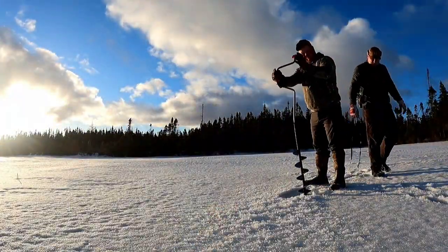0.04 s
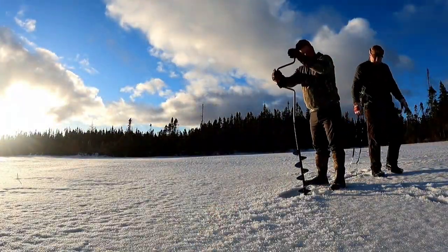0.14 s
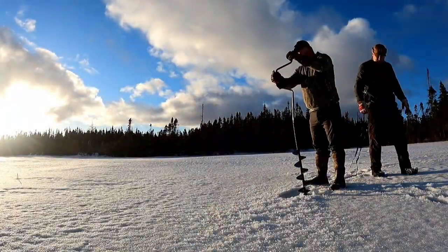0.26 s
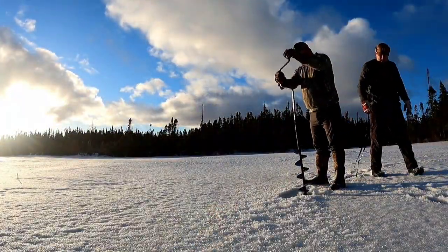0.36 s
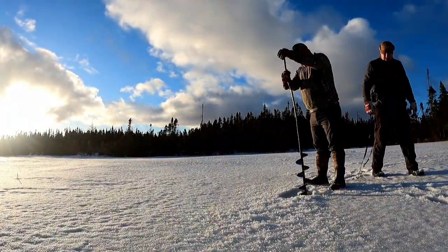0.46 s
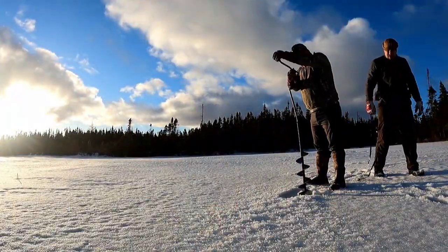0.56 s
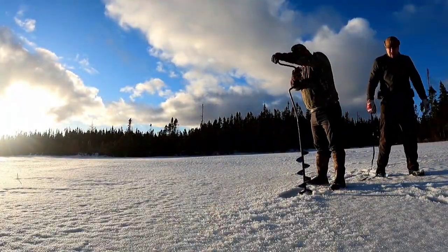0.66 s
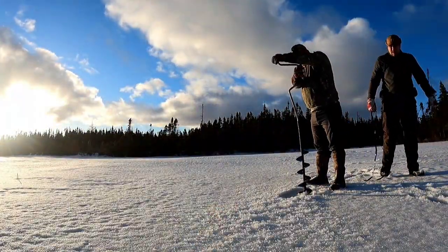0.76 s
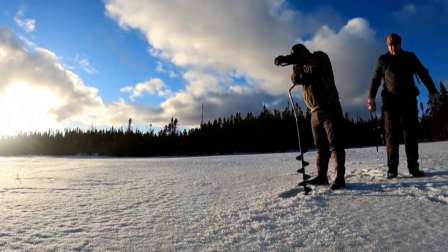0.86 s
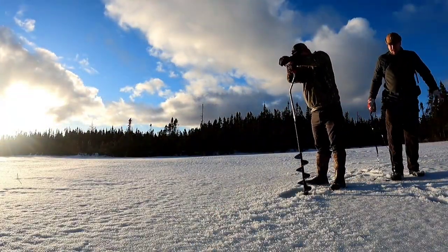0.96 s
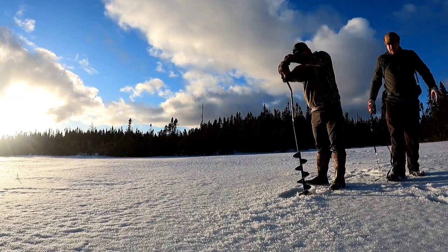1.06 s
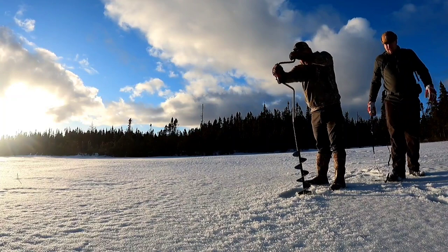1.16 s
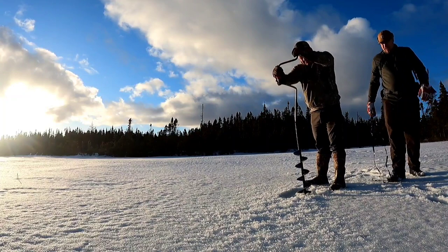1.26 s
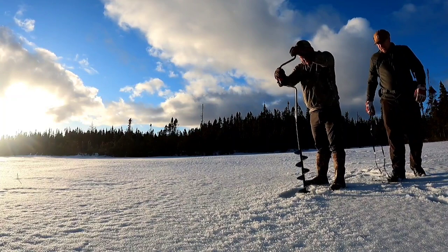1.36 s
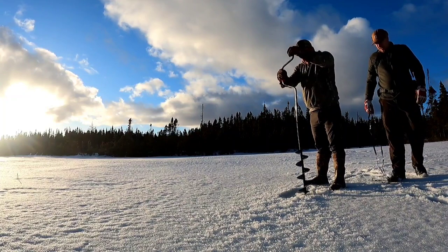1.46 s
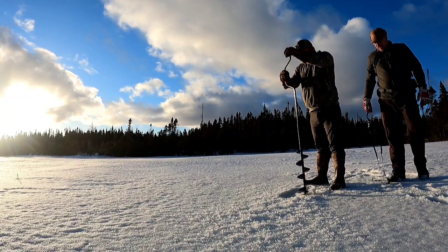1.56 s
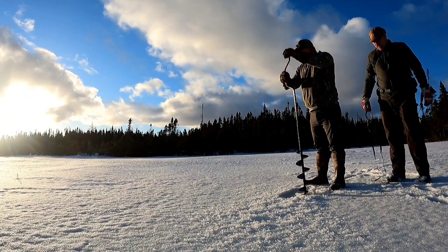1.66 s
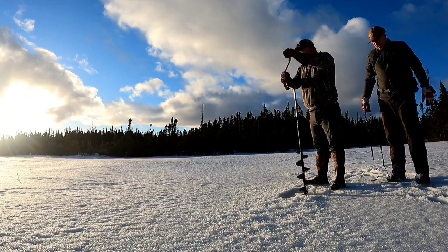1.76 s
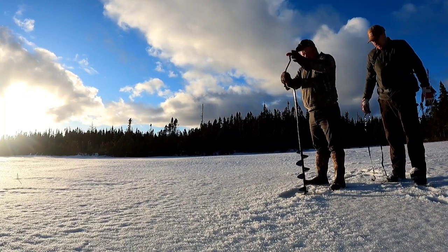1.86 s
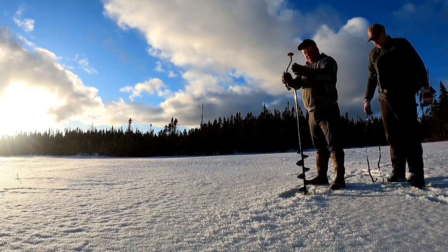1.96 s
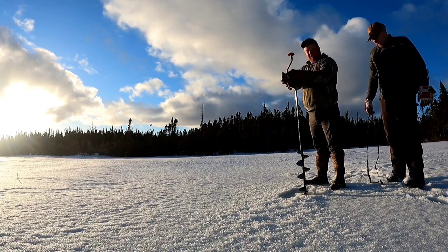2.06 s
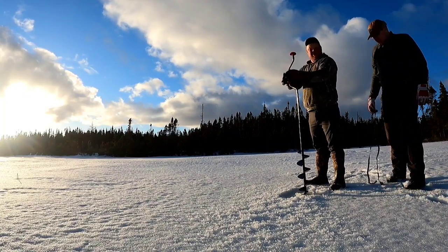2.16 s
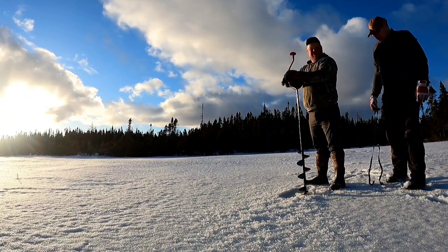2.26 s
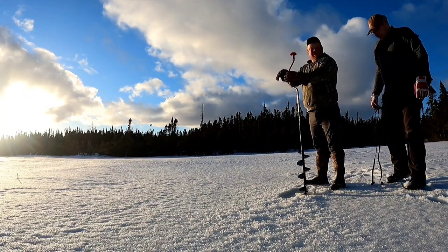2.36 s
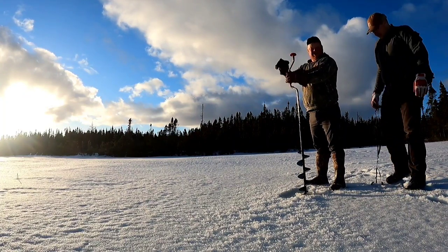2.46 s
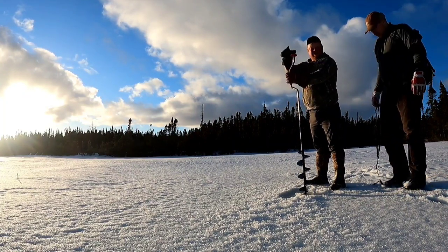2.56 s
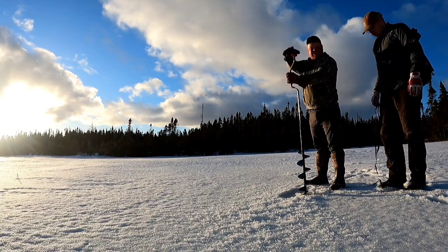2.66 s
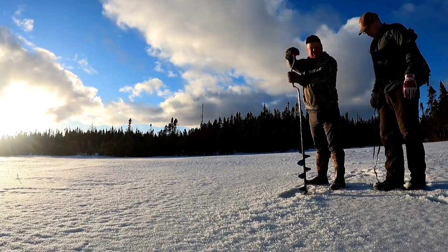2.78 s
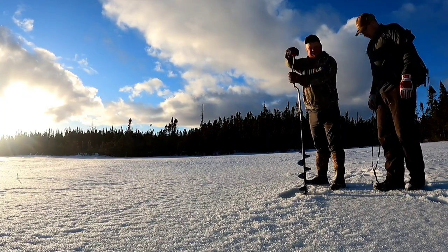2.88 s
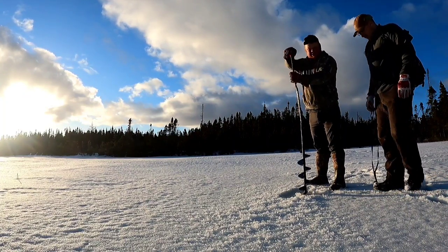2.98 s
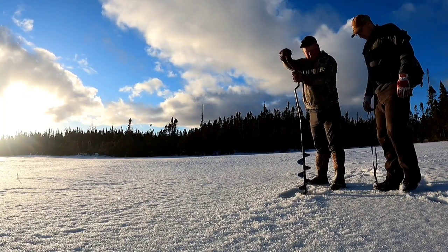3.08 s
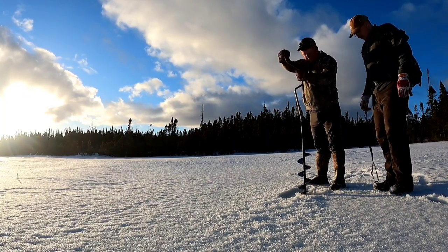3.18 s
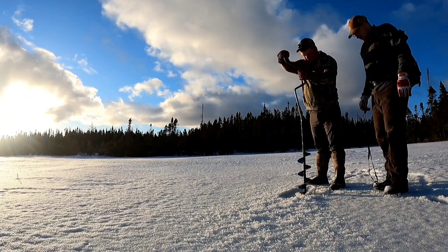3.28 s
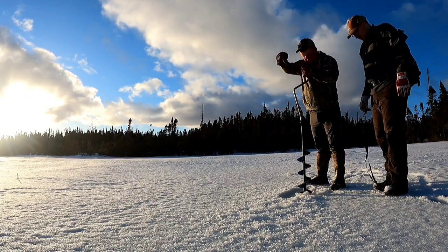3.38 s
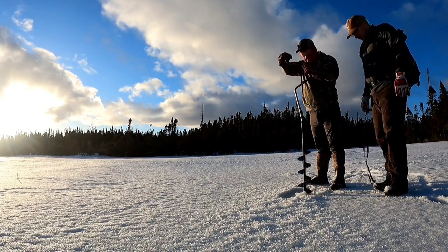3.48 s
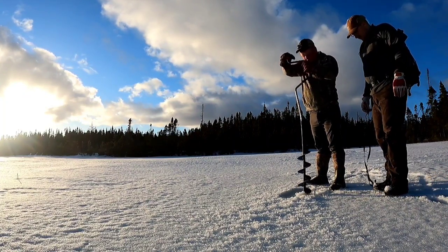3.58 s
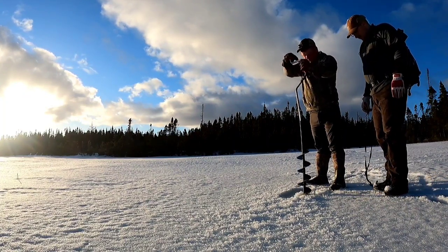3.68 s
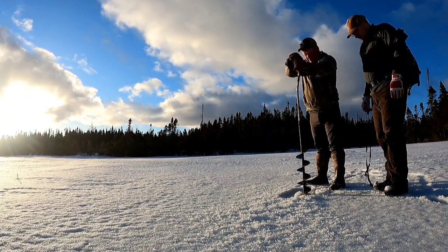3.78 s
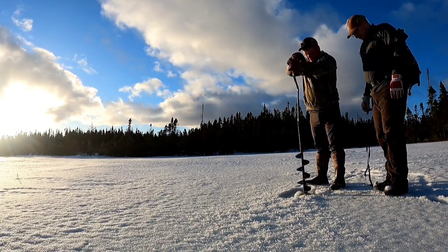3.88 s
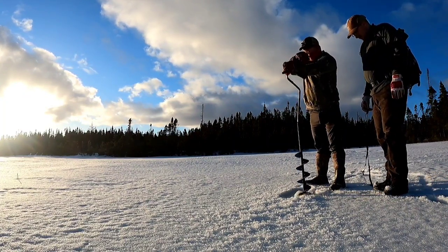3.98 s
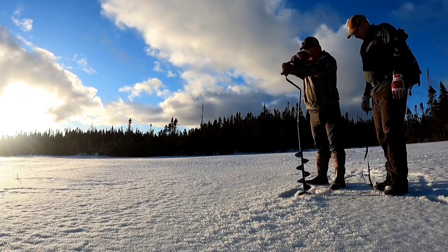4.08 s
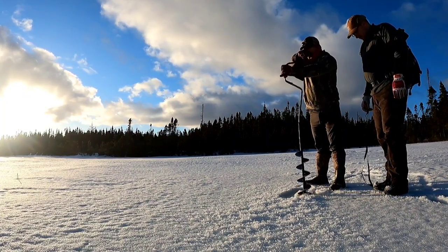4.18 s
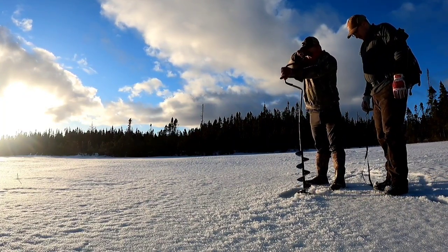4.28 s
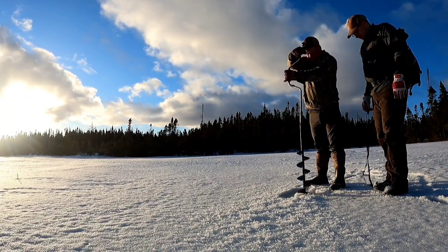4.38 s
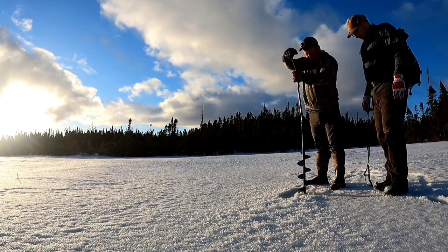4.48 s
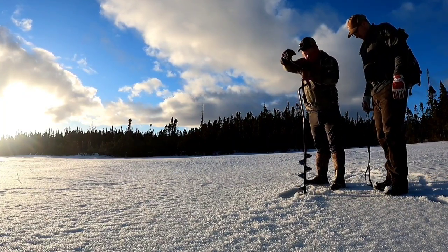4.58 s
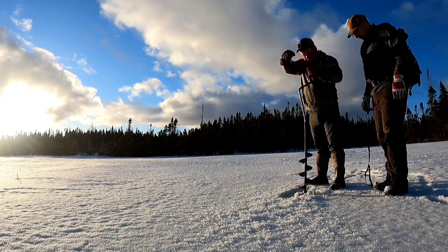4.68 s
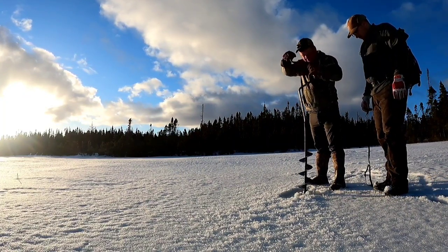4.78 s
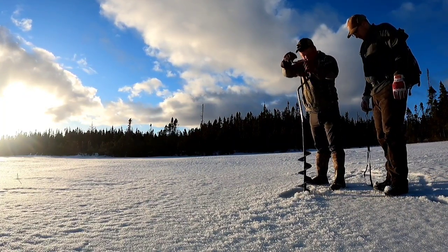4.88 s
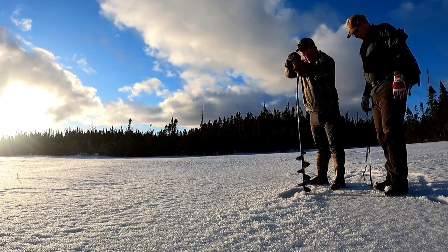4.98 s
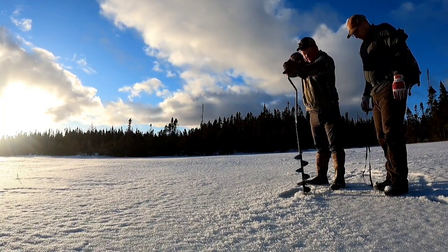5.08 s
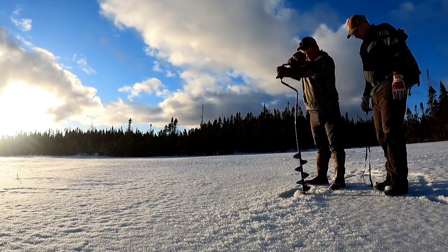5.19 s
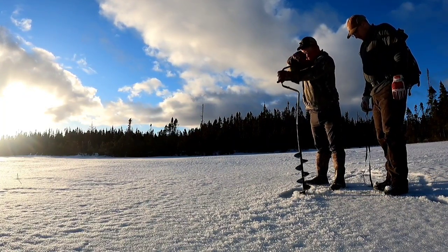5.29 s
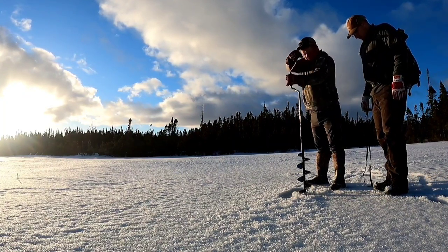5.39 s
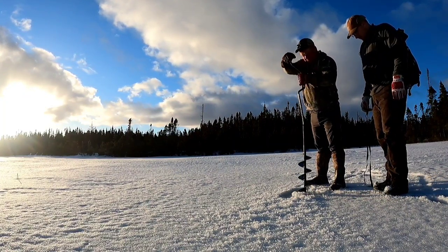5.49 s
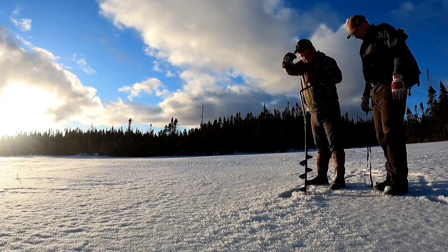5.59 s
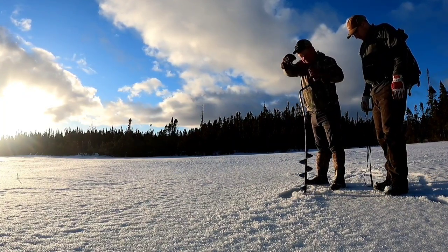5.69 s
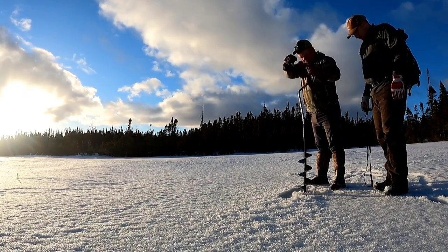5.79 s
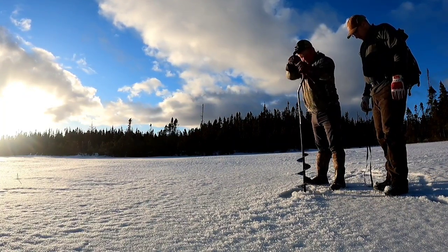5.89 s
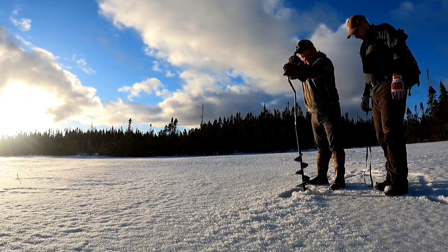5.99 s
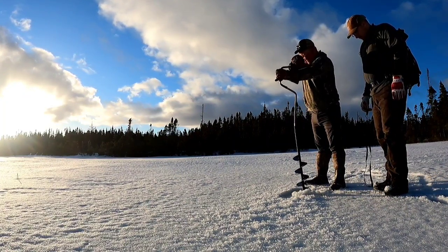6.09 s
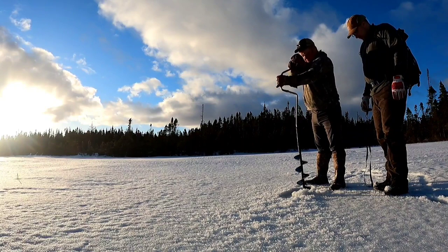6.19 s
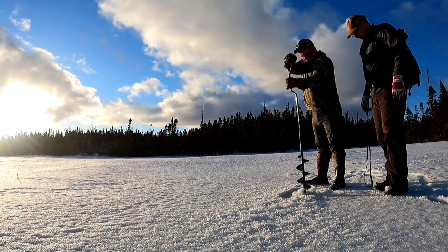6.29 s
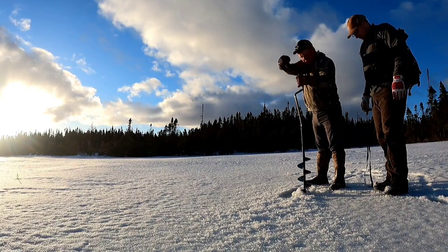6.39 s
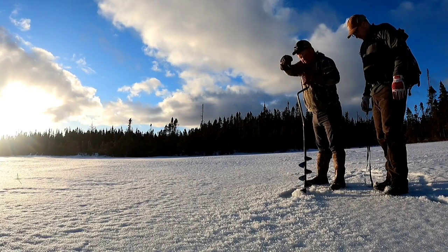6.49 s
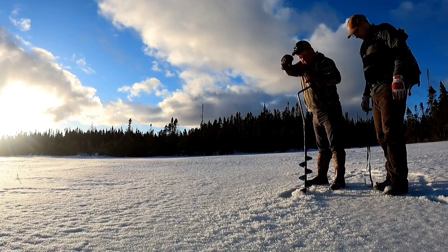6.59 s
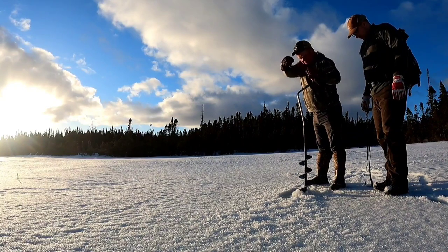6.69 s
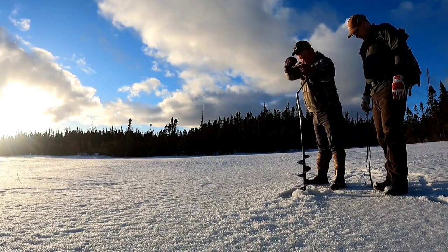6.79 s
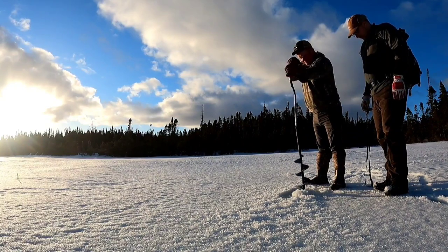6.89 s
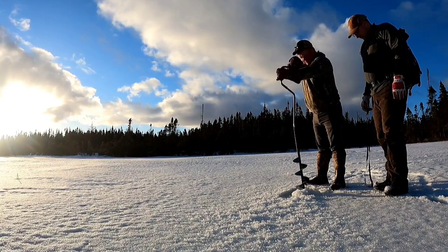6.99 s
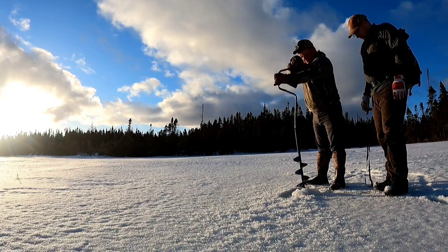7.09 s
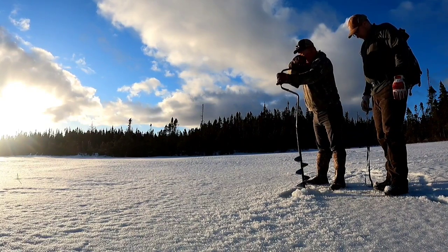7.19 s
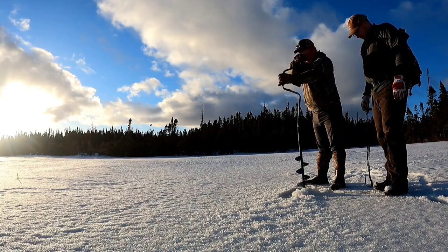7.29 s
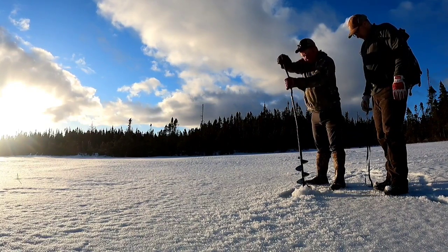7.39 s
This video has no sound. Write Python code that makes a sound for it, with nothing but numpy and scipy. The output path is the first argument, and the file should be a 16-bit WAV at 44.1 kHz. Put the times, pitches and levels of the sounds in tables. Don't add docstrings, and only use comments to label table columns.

```python
import sys
import numpy as np
from scipy import signal
from scipy.fft import rfft, irfft, next_fast_len
from scipy.io import wavfile
from scipy.ndimage import uniform_filter1d

SR = 44100
rng = np.random.default_rng(int(sys.argv[2]) if len(sys.argv) > 2 else 0)


def gain_from_decibels(decibels):
    exponent = np.asarray(decibels, float) / 20
    return 10 ** exponent


def persist_wave(psi):
    counts = np.round(np.clip(psi, -1, 1) * 32767).astype(np.int16)
    wavfile.write(sys.argv[1], SR, np.atleast_2d(counts).T)


N = 328545


def evened(x):
    return x / np.sqrt(np.mean(x ** 2) + 1e-20)


def read(points, hz):
    f, value = np.transpose(points)
    return np.interp(np.log(hz + 1), np.log(f + 1), value)


def coloured(x, points, low_hz=1, high_hz=SR):
    size = next_fast_len(N)
    hz = np.fft.rfftfreq(size, 1 / SR)
    gain = gain_from_decibels(read(points, hz)) * (hz < points[-1][0])
    edge_loss = (1 + (low_hz / (hz + 0.1)) ** 30) * (1 + (hz / high_hz) ** 30)
    gain *= edge_loss ** -0.5
    return irfft(rfft(x, size) * evened(gain), size)[:N]


def wander(per_s):
    knots = uniform_filter1d(rng.standard_normal(400), size=2)
    return np.interp(np.arange(N) * per_s / SR, np.arange(400), evened(knots))


def ring(x, hz, width):
    r = np.exp(-np.pi * width / SR)
    pole = r * np.exp(2j * np.pi * hz / SR)
    return signal.lfilter([np.sqrt(2 * (1 - r * r))], [1, -pole], x).imag


def grit(per_s, spread_db, hiss, shake_db):
    sizes = gain_from_decibels(spread_db * np.minimum(rng.exponential(1, N), 5))
    snaps = sizes * (rng.random(N) < per_s / SR)
    snaps = snaps * rng.choice([-1, 1], N)
    mixed = evened(snaps) + hiss * rng.standard_normal(N)
    return evened(mixed * gain_from_decibels(shake_db * wander(45)))


def patchy(x, depth_db):
    z = signal.stft(x, nperseg=256, noverlap=192)[2]
    field = uniform_filter1d(rng.standard_normal(z.shape), size=3, axis=0)
    field = uniform_filter1d(field, size=40, axis=1)
    gain = evened(gain_from_decibels(depth_db * evened(field)))
    return signal.istft(z * gain, nperseg=256, noverlap=192)[1][:N]


def swells(rows, rest_db):
    t, power = np.arange(0, N, 16) / SR, gain_from_decibels(2 * rest_db)
    for peak_s, level_db, rise_s, fall_s in rows:
        drop_db = 10 * np.where(t < peak_s, (peak_s - t) / rise_s, (t - peak_s) / fall_s)
        power = power + gain_from_decibels(2 * (level_db - drop_db))
    return np.interp(np.arange(N) / SR, t, 10 * np.log10(power))


# pitch_hz, density_db [dB per Hz]
AIR_COLOUR = [(180, -39), (300, 2), (543, -26), (1030, 2.5), (2730, -17), (6130, -15), (11100, -27),
              (15400, -40)]


def air():
    return gain_from_decibels(-60.5) * coloured(rng.standard_normal(N), AIR_COLOUR)


# pitch_hz, density_db [dB per Hz]
GUST_COLOUR = [(8.8, -36), (15, 0), (45, -4.5), (135, -22.5), (180, -56), (300, -120)]
# peak_s, level_db, rise_s, fall_s
GUST_SWELLS = [(0.0, -42.5, 0.12, .4), (0.37, -38.5, .15, 0.53), (0.97, -38, 0.18, .2),
               (1.14, -29, 0.13, 0.094), (1.28, -25.5, .03, 0.047), (1.45, -45, 0.13, .09),
               (1.72, -42, 0.15, .07), (1.84, -34, 0.019, .15), (2.1, -42.5, .3, .3),
               (2.55, -38, 0.22, 0.2), (2.86, -29.5, .03, .025), (3.2, -44.5, 0.38, 0.27),
               (3.55, -38.5, 0.045, 0.04), (3.8, -37, 0.099, 0.044), (4.04, -35.5, 0.12, .055),
               (4.17, -39.5, 0.055, .24), (4.58, -34, 0.11, .08), (4.83, -35.5, 0.27, .2),
               (5.1, -40, .2, .3), (5.39, -34.5, 0.32, 0.082), (5.58, -40, .3, 0.34),
               (5.81, -29, .045, .07), (6.12, -45, 0.062, .085), (6.6, -31, .035, 0.14),
               (7.1, -39, .06, .08), (7.35, -40.5, 0.088, 0.041)]
# start_s, peak_db, pitch_hz, t60_s
WIND_SLAPS = [
    (0.344, -23.5, 46.4, 0.13),
    (0.713, -24, 32, 0.095),
    (1.275, -29, 48.4, 0.1),
    (1.847, -20, 40.7, 0.053),
    (1.959, -25, 43.4, 0.14),
    (2.684, -21, 32, 0.15),
    (2.783, -22.5, 43.1, 0.1),
    (6.592, -19.5, 62, 0.21),
]


def wind():
    shared = coloured(grit(60, 5.0, 0.79, 0.94), GUST_COLOUR)
    apart = coloured(grit(60, 5.0, 0.79, 0.94), GUST_COLOUR)
    gust, t = gain_from_decibels(swells(GUST_SWELLS, rest_db=-66)), np.arange(6000) / SR
    shared = shared * gust
    for start_s, peak_db, pitch_hz, t60_s in WIND_SLAPS:
        at = round(start_s * SR)
        thump = np.sin(2 * np.pi * pitch_hz * t) * np.minimum(t / 0.0041, 1)
        shared[at:at + len(t)] += gain_from_decibels(peak_db - 60 * t / t60_s) * thump
    return shared * gain_from_decibels([[-2.5], [2.1]]) + 0.46 * gust * apart * np.array([[1], [-1]])


# pitch_hz, density_db [dB per Hz]
SNOW_COLOUR = [(150, -33), (250, -4), (507, -9), (592, -9.5), (960, -3.5), (1480, -10), (2160, -13),
               (5030, -11.5), (8300, -23), (12100, -24), (15400, -43)]
# peak_s, level_db, rise_s, fall_s, cloth_db [against the crunch]
BOOT_STEPS = [(0.0, -49.5, .02, 0.032, -9), (0.064, -53, .03, 0.015, -4), (0.15, -73, .2, .2, -6),
              (0.275, -52, 0.027, .03, -7), (1.7, -51.5, .05, 0.13, -5), (1.78, -55, 0.066, 0.03, -6),
              (1.86, -53, 0.039, .05, -7), (1.9, -57, .03, .015, -6), (2.04, -53, 0.043, 0.11, -12),
              (2.132, -48.5, .004, 0.021, -18), (2.24, -46, 0.13, 0.02, -13.5),
              (2.3, -51, 0.023, 0.074, -14), (2.406, -55.5, 0.035, 0.075, -9), (2.51, -58, 0.048, 0.14, -4),
              (2.61, -56, 0.023, 0.12, -2.5), (2.715, -50.5, 0.033, .08, -4),
              (2.79, -39.5, 0.051, 0.075, -12), (2.901, -38, .003, 0.025, -14),
              (2.94, -52.5, .03, .15, -11), (3.04, -56, .04, .02, -15)]


def shuffle():
    cloth_hz, rest_db = 7000, -86
    steps = np.array(BOOT_STEPS)
    crunch_db = swells(steps[:, :4], rest_db)
    cloth_steps = steps[:, :4] + np.outer(steps[:, 4], [0, 1, 0, 0])
    cloth_db = swells(cloth_steps, rest_db - 8)
    grains = grit(5000, 2.5, 1.4, 1.3)
    crunch = coloured(grains * gain_from_decibels(crunch_db), SNOW_COLOUR, 1, cloth_hz)
    cloth = coloured(grains * gain_from_decibels(cloth_db), SNOW_COLOUR, cloth_hz)
    return gain_from_decibels(4.5) * crunch + gain_from_decibels(1.0) * cloth


# start_s, peak_db, pitch_hz, t60_s, crack_db [against the peak]
DULL_KNOCKS = [
    (1.187, -21, 215, 0.03, -12),
    (1.265, -22.5, 930, 0.028, -12),
    (2.131, -39, 163, 0.055, -12),
    (2.244, -26, 151, 0.042, -4),
    (2.487, -34, 190, 0.081, -7),
    (2.778, -32, 199, 0.056, -12),
    (2.898, -25, 159, 0.058, -8),
    (2.5426, -37, 1100, 0.043, -20),
]


def knocks():
    out, t = np.zeros(N), np.arange(3000) / SR
    for start_s, peak_db, pitch_hz, t60_s, crack_db in DULL_KNOCKS:
        crack = signal.lfilter(*signal.butter(2, 5000, fs=SR), rng.standard_normal(len(t)))
        crack = crack * np.exp(-t / 0.012)
        body = np.sin(2 * np.pi * pitch_hz * t) * gain_from_decibels(-60 * t / t60_s)
        blow = body + gain_from_decibels(crack_db) * crack / 3
        at = round(start_s * SR)
        out[at:at + len(t)] += gain_from_decibels(peak_db) * blow * np.minimum(t / 0.0018, 1)
    return out


# time_s, seating [0-1], weight [0-1], flex [0-1]
DRILLER_GRIP = [(0.3, 0.43, 0.45, 0.02), (0.6, 0.55, 0.45, 0.53), (0.72, 0.3, 0.05, 0.73),
                (0.86, 0.07, .0, 0.38), (1.1, 0.37, 0.4, 0.4), (1.3, .2, 0.6, 0.42), (1.6, 0.58, 0.68, .75),
                (3.1, 0.54, .4, 0.68), (3.37, 0.52, 0.6, 0.81), (3.5, 0.18, .0, 0.57),
                (3.9, 0.36, 0.67, 0.69), (4.12, 0.42, 0.3, 0.81), (4.3, 0.6, 0.4, 0.74),
                (4.55, .3, .5, 0.94), (5.0, 0.61, .45, 0.85), (5.4, 0.87, .4, 0.97), (5.95, 0.96, .8, 0.94),
                (7.0, 0.92, 1.15, 1.)]


def grip():
    time_s, *columns = np.transpose(DRILLER_GRIP)
    return [np.interp(np.arange(N) / SR, time_s, c) for c in columns]


# peak_s, effort_db, rise_s, fall_s
CRANK_PUSHES = [(.33, -41, .07, .15), (.453, -30, 0.072, 0.26), (.733, -32, 0.1, 0),
                (1.01, -32, 0.12, 0.27), (1.09, -31.5, 0.35, 0.2), (1.287, -33.5, 0.036, .04),
                (1.46, -33, 0.14, 0.4), (3.047, -46, 0.018, .08), (3.164, -34.5, 0.1, .2),
                (3.435, -31, .11, 0.35), (3.657, -33, .02, 0.4), (3.821, -28.5, 0.088, .13),
                (4.083, -29, 0.19, 0.1), (4.264, -30, .03, 0.4), (4.495, -23, 0.17, 0.23),
                (4.786, -25.5, .36, 0.32), (4.964, -25.3, 0.065, 0.32), (5.163, -26.5, 0.11, 0.07),
                (5.302, -26.5, .08, 0.1), (5.501, -22.1, 0.18, .09), (5.69, -28.5, 0.034, 0.2),
                (5.903, -26, .17, 0.3), (6.089, -24.5, 0.028, 0.15), (6.434, -25.5, 0.31, 0.17),
                (6.675, -36, 0.012, 0.2), (6.705, -30, 0.014, 0.04), (6.77, -30, .03, 0.3),
                (6.922, -26, .14, 0.27), (7.1, -25.5, .1, .06), (7.405, -23, 0.047, .08)]
# catch_s, stop_s, decay_db_per_s
CUTTING_RUNS = [
    (0.262, 1.642, 218),
    (3.02, 4.115, 180),
    (4.193, 5.595, 300),
    (5.62, 6.534, 700),
    (6.642, 6.687, 400),
    (6.69, 7.17, 1000),
    (7.342, 7.5, 400),
]


def crank():
    t, catch_time_s, biting = np.arange(N) / SR, 0.0032, 0
    for catch_s, stop_s, decay_db_per_s in CUTTING_RUNS:
        dying = gain_from_decibels(-decay_db_per_s * np.maximum(t - stop_s, 0))
        biting = biting + np.clip((t - catch_s) / catch_time_s, 0, 1) * dying
    return swells(CRANK_PUSHES, rest_db=-90) + 20 * np.log10(np.clip(biting, 1e-4, 1))


# pitch_hz, density_db [dB per Hz]
DRONE_COLOUR = [(59, -13), (100, -4), (134, -22.5), (183, 3.5), (210, 7), (243, 5), (317, 1.5), (448, 4.5),
                (521, 1), (560, -11), (730, -21), (1230, -120)]
# peak_s, level_db, rise_s, fall_s
WEIGHT_SHIFTS = [(0.56, -50.5, .4, 0.59), (1.1, -54.5, 0.33, .3), (1.45, -46.5, .12, .1),
                 (1.7, -50.5, .3, .09), (2.3, -51.5, .6, 0.64), (2.85, -45, 0.37, .08),
                 (3.38, -46.5, 0.39, .05), (3.63, -50, 0.19, 0.39), (4.11, -47, 0.098, .07),
                 (4.58, -42.5, .22, 0.13), (5.4, -47.5, 0.91, 0.64), (5.97, -46.5, .12, .2),
                 (6.39, -48.5, .5, .25), (6.62, -50, 0.089, .3), (6.99, -45.5, 0.55, .09),
                 (7.16, -46.5, .06, 0.14), (7.4, -44, .1, .2)]


def ice_sheet():
    drone_db = swells(WEIGHT_SHIFTS, rest_db=-62)
    loose_db, firm_db = -28, -12.5
    weight = grip()[1]
    groan = gain_from_decibels(crank() + loose_db + (firm_db - loose_db) * weight) + gain_from_decibels(-63)
    shake = grit(600, 4.3, 0.77, 0.45)
    thickness_mode = ring(shake, 190.7, 26)
    drone = evened(coloured(shake, DRONE_COLOUR, 1, 262) + gain_from_decibels(-3) * thickness_mode)
    return gain_from_decibels(drone_db) * drone + groan * coloured(shake, DRONE_COLOUR, 267)


# pitch_hz, spread_octaves, start_db, end_db
SINKING_MODES = [(815, .08, -9, 3), (1560, .13, 8, -3), (2170, .1, -4, 2), (5900, .25, 6, -2)]
# peak_s, pitch_hz, gain_db, length_s
SINGING_MODES = [
    (.72, 1589, 7.5, 0.039),
    (1.063, 1620, 5, 0.092),
    (1.5, 1255, 5, 0.13),
    (3.497, 1052, 10, 0.14),
    (3.5, 1589, 10, .06),
    (3.5, 860, -11, .2),
    (4.45, 1052, 5.5, 0.24),
    (4.75, 920, 4, 0.1),
    (5.252, 700, 8, .12),
    (6.403, 1255, 5, .12),
]


def facing(mode_hz):
    t = np.arange(N) / SR
    turning = evened(gain_from_decibels(4.5 * np.tanh(wander(7))))
    from_db = to_db = sing_db = 0
    for pitch_hz, spread_octaves, start_db, end_db in SINKING_MODES:
        nearness = np.exp(-(np.log2(mode_hz / pitch_hz) / spread_octaves) ** 2)
        from_db, to_db = from_db + nearness * start_db, to_db + nearness * end_db
    for peak_s, pitch_hz, gain_db, length_s in SINGING_MODES:
        if abs(np.log2(mode_hz / pitch_hz)) < 0.06:
            sing_db = sing_db + gain_db * np.exp(-((t - peak_s) / length_s) ** 2)
    return turning * gain_from_decibels(np.linspace(from_db, to_db, N) + sing_db)


def steel(chips, modes):
    out, power = 0, 0
    for pitch_hz, width_hz, peak_db in modes:
        heard = chips * facing(pitch_hz)
        sides = 1 - 2 * rng.integers(0, 2, N, dtype=np.int8)
        out += gain_from_decibels(peak_db) * np.sqrt(width_hz) * ring(heard * sides, pitch_hz, width_hz)
        power += gain_from_decibels(2 * peak_db) * width_hz
    return out / np.sqrt(power)


# pitch_hz, width_hz, peak_db
BOOM_MODES = [(592, 35, -8), (636, 30, 0), (700, 45, -5)]
SHAFT_MODES = [(830, 18, -2), (895, 30, -5), (944, 26, 1), (1052, 24, -1), (1150, 40, -8), (1255, 38, -1),
               (1439, 26, -5)]
FLIGHT_MODES = [(1589, 28, 1), (1660, 40, -2), (1858, 32, 0), (2092, 60, -2), (2240, 40, -3),
                (2535, 45, -4), (2780, 40, -6), (3240, 55, -2), (3430, 28, -5), (3556, 28, 0),
                (3655, 35, -3), (3772, 38, -1), (4260, 70, -7), (4689, 42, 2), (4850, 80, -4),
                (5004, 38, 2), (5520, 70, -6), (5720, 90, -6), (6220, 80, -6)]
BLADE_MODES = [(6720, 100, -5), (7406, 28, -1), (7610, 40, -1), (7735, 80, 0), (8200, 35, -6)]
# low_hz, high_hz
FAMILY_BANDS = [(560, 780), (780, 1500), (1500, 6500), (6500, 15500)]
FAMILY_CRUSH_DB = [-10, -7.5, -3, -1]
# pitch_hz, density_db [dB per Hz]
CRUSH_COLOUR = [(320, -47), (540, -32), (630, -2), (778, -21), (933, 3.5), (1270, 8.5), (1360, -6),
                (2140, -8.5), (2390, -14.5), (4820, -8), (5320, -18), (10300, -20), (13800, -35),
                (15400, -62)]
# start_s, peak_db
BLADE_BITES = [
    (0.278, -34),
    (4.193, -26),
    (5.625, -15.5),
    (6.644, -22.5),
    (6.695, -15.5),
    (7.344, -22.5),
]


def auger():
    t, effort_db = np.arange(N) / SR, crank()
    seating, _, flex = grip()
    boom_db = -26.5 + (2.0 + 26.5) * seating
    shaft_db = -13.5 + (3.5 + 13.5) * flex
    fizz_db = -11 + 0.24 * np.minimum(-23 - effort_db, 20) - 1.5 * seating
    effort = gain_from_decibels(effort_db)
    for start_s, peak_db in BLADE_BITES:
        effort += gain_from_decibels(peak_db - 6.5) * (t > start_s) * np.exp(-abs(t - start_s) / 0.0027)
    chips = grit(4000, 4.4, 1.27, 1.0)
    clumps = patchy(chips, depth_db=2.2)
    families = (BOOM_MODES, SHAFT_MODES, FLIGHT_MODES, BLADE_MODES)
    levels = (boom_db, shaft_db, 0, fizz_db)
    out = np.zeros(N)
    for modes, (low_hz, high_hz), crush_db, level_db in zip(families, FAMILY_BANDS, FAMILY_CRUSH_DB, levels):
        push = effort * gain_from_decibels(level_db)
        edges_hz = (0.96 * low_hz, min(1.07 * high_hz, 9000))
        band = signal.butter(3, edges_hz, "band", fs=SR, output="sos")
        ringing = signal.sosfilt(band, steel(chips * push, modes))
        crush = coloured(clumps * push, CRUSH_COLOUR, low_hz, high_hz)
        out += (ringing + gain_from_decibels(crush_db) * crush) / np.sqrt(1 + gain_from_decibels(2 * crush_db))
    return out


# pitch_hz, likeness [0-1]
PORT_LIKENESS = [(60, 0.19), (130, 0.74), (290, 0.98), (640, 0.97), (1410, 0.95), (3100, 0.85),
                 (6810, 0.95), (15000, 0.85)]
# pitch_hz, level_db
PORT_LEAN = [(60, -4), (130, 1), (290, -3), (640, -3.5), (1410, -4), (3100, -3), (6810, -3.5),
             (15000, -1.5)]
# pitch_hz, phase_rad
PORT_LEAD = [(0, 0), (3530, -0.8), (5340, -0.4), (6720, -0.5), (8270, 0.0), (11500, -0.0), (11800, 0.5),
             (12900, 0.0), (15200, -0.0)]


def ports(x):
    scatter = rng.standard_normal(2000) * np.exp(-np.arange(2000) / 150)
    size = next_fast_len(N + 2000)
    hz, left = np.fft.rfftfreq(size, 1 / SR), rfft(x, size)
    paths = rfft(scatter / np.linalg.norm(scatter), size)
    same = np.clip(read(PORT_LIKENESS, hz), 0, 1)
    lag = np.exp(-1j * np.interp(hz, *np.transpose(PORT_LEAD)))
    right = left * (same + np.sqrt(1 - same ** 2) * paths) * lag
    tilt = gain_from_decibels(read(PORT_LEAN, hz) / 2)
    return irfft(np.array([left * tilt, right / tilt]), size)[:, :N]


def scene():
    airborne = auger() + shuffle() + knocks() + ice_sheet() + air()
    return ports(airborne) + wind()


def band_limit(x):
    return signal.sosfilt(signal.butter(12, 15590, fs=SR, output="sos"), x)


def record(dry):
    return band_limit(dry)


dry = scene()
out = record(dry)
persist_wave(out)
```